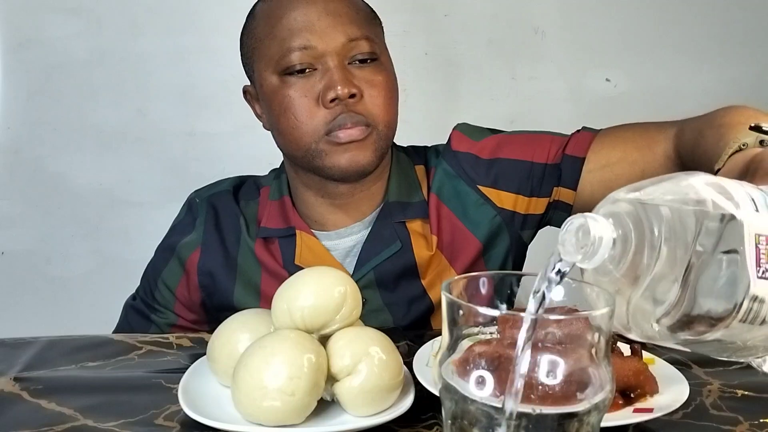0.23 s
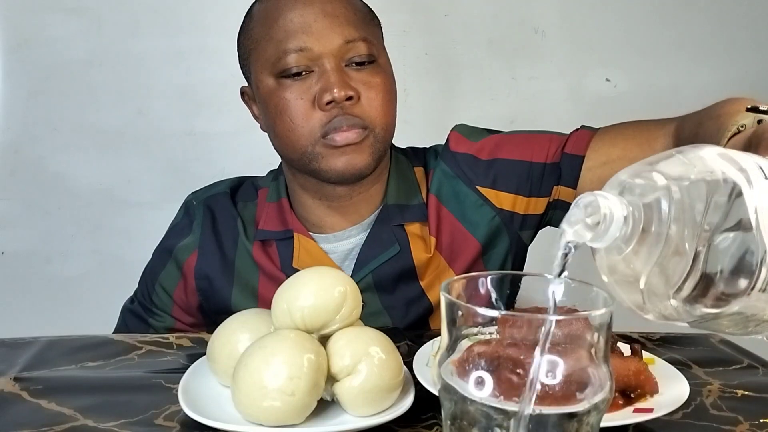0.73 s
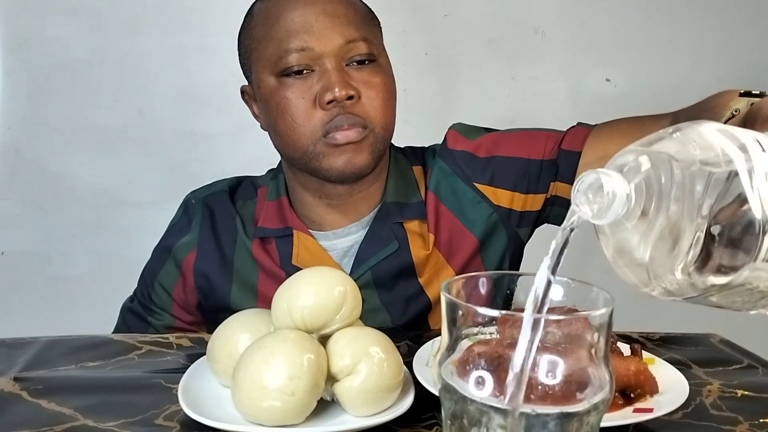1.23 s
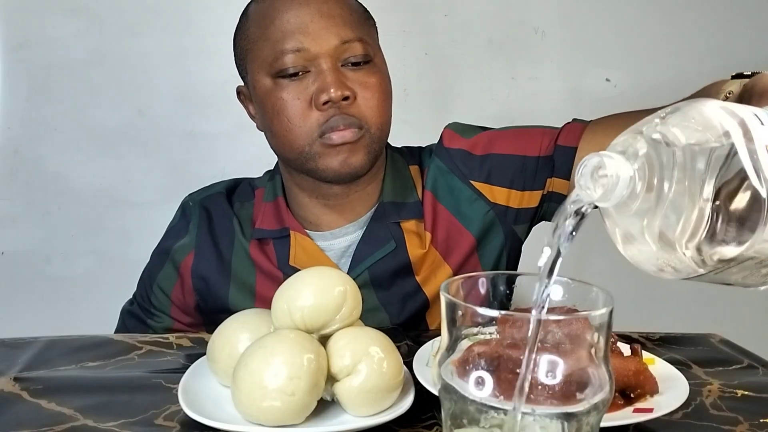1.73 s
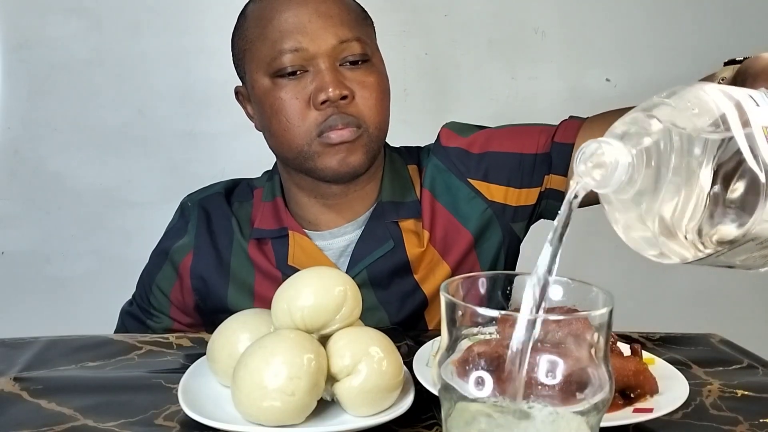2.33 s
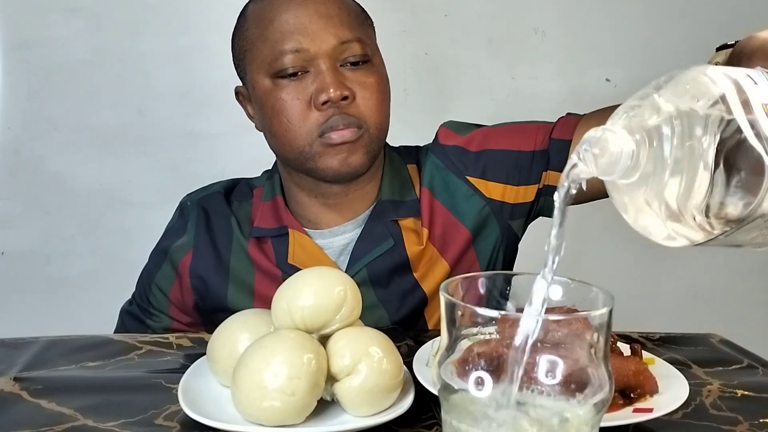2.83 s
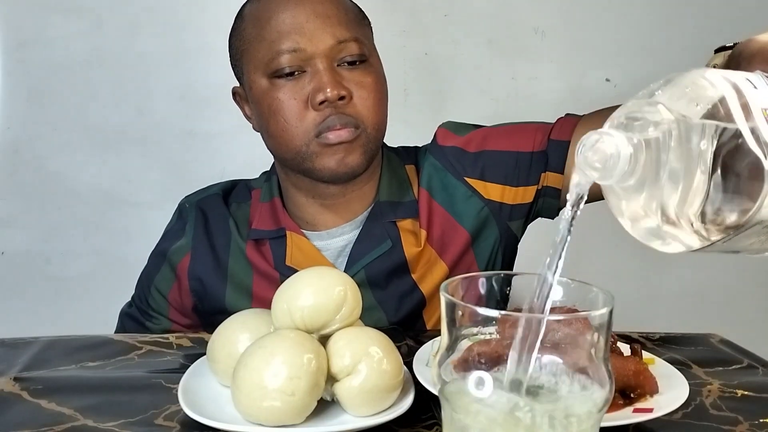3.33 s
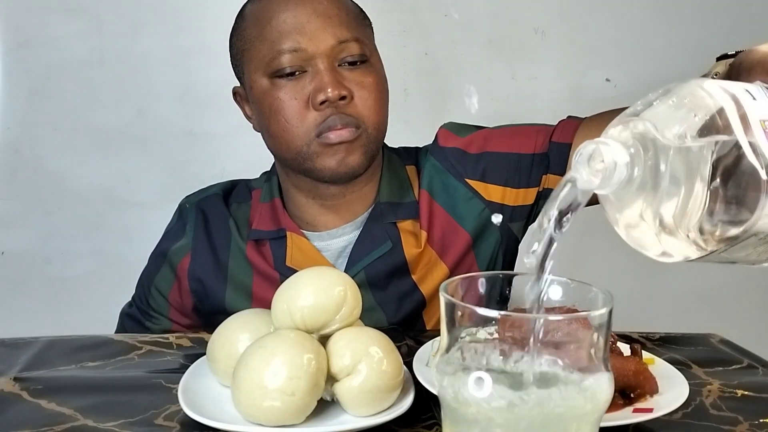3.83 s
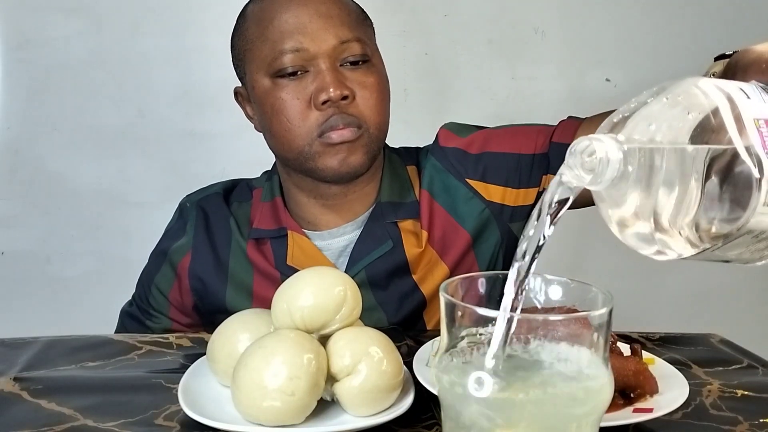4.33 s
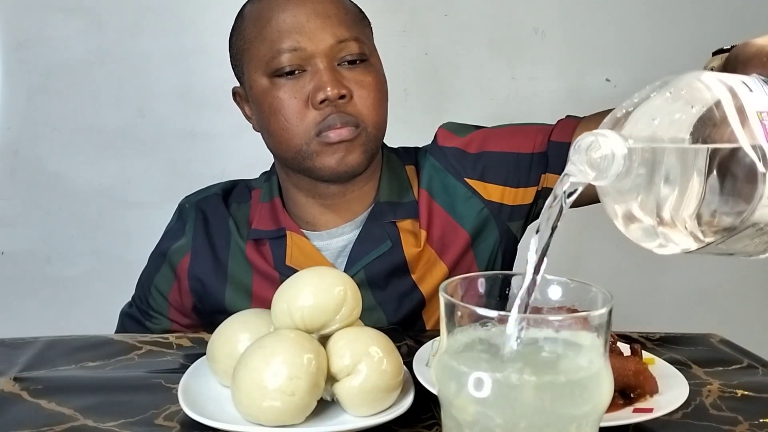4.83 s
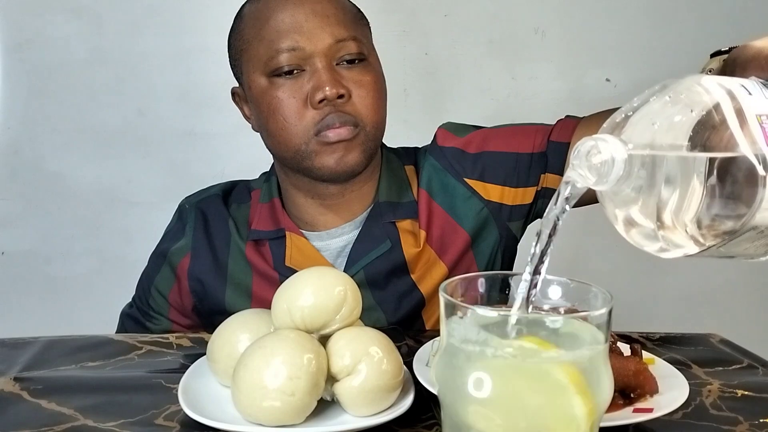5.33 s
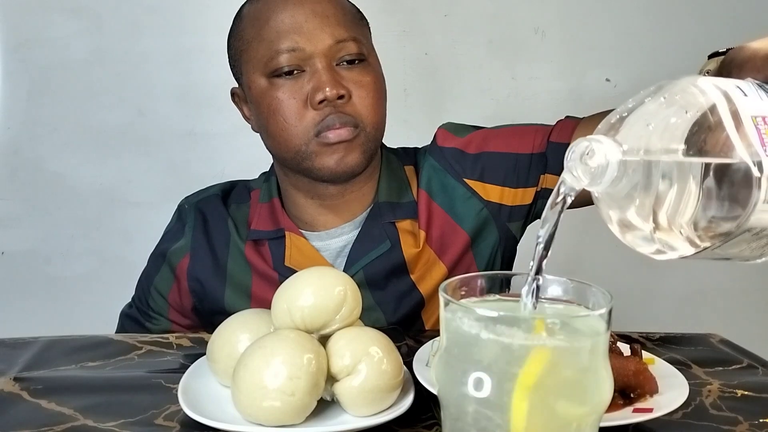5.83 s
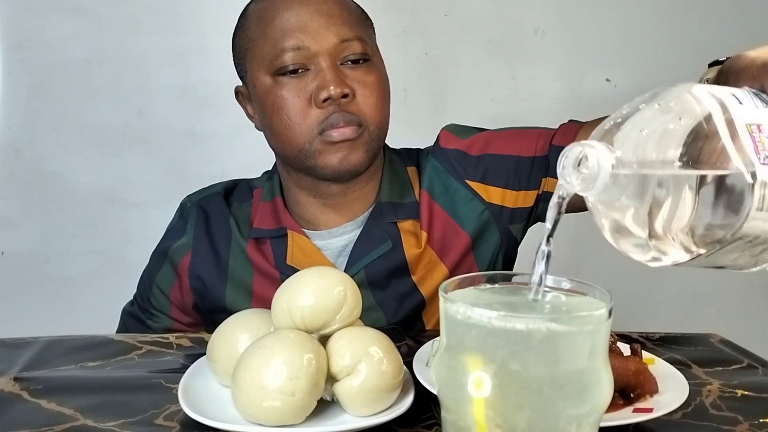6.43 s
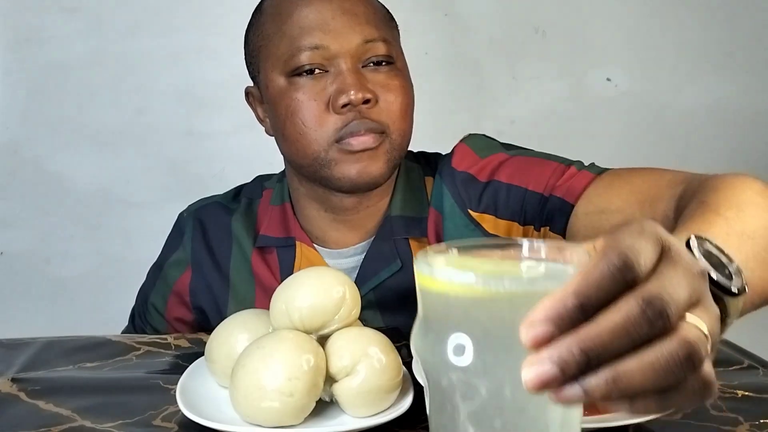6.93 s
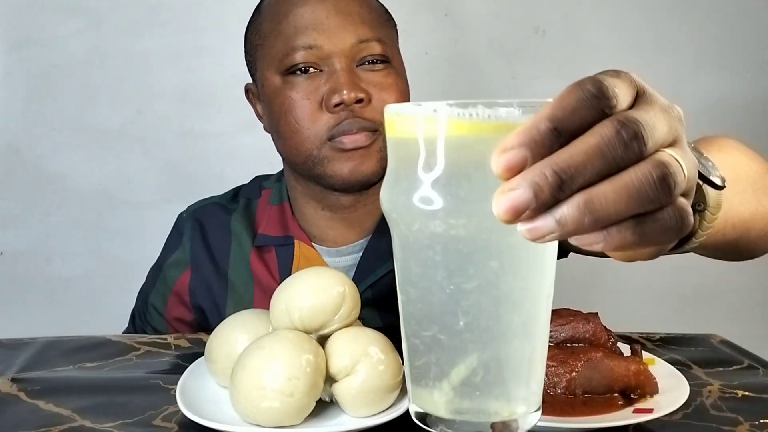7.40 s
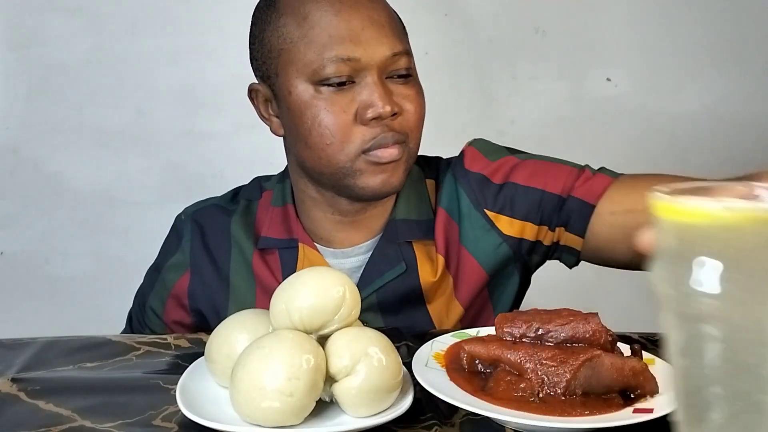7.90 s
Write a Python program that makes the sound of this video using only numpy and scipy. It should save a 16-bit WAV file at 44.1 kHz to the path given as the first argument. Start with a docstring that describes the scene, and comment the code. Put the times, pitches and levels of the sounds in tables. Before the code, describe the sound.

Close-up pouring of water from a big plastic bottle into a drinking glass on a table. A brief plastic snap, a light fizzing trickle, hollow gurgles, then heavier splashing with small table thumps. The glass's hollow note creeps upward; the flow breaks into sparse drips, and a few faint knocks ring briefly in the small bare room over soft hiss.

```python
"""In a bare room, close to a stereo microphone, water is poured from a big plastic bottle into a glass.
The stream drags bubbles under; they ring as decaying sines, coloured by the shortening air column.
Midway it surges and slaps: noise bursts, low pushes of air, rising pocket notes and table modes.
The flow thins to drips, and the bottle is put aside with snaps, modal knocks and a swell of dense noise.
Shaped noise and wavering sines lie beneath as soft hiss and faint hum."""
import sys
import numpy as np
from scipy import signal
from scipy.fft import rfft, irfft
from scipy.io import wavfile

SR = 44100
rng = np.random.default_rng(int(sys.argv[2]) if len(sys.argv) > 2 else 0)


def log_audio(samples):
    """Write samples as a 16-bit WAV file to the path given in sys.argv[1]."""
    # one column per channel
    frames = np.atleast_2d(samples).T
    # limit to full scale, then quantise
    limited = np.clip(frames, -1, 1)
    pcm = np.round(limited * 32767).astype(np.int16)
    wavfile.write(sys.argv[1], SR, pcm)


N = 359944
TIME = np.arange(N) / SR


def amp(db):
    """Level to amplitude: 20 dB is a factor of ten."""
    return 10 ** (np.asarray(db) / 20)


def evened(x):
    """Normalization to unit rms."""
    return x / np.sqrt(np.mean(x ** 2) + 1e-20)


def read(points, hz):
    """Spectral interpolation on a log-frequency axis."""
    f, value = np.transpose(points)
    return np.interp(np.log(hz + 1), np.log(f + 1), value)


def add(mix, s, sound):
    """Superposition: a sound is added to the mix at time s."""
    part = mix[..., max(round(s * SR), 0):][..., :sound.shape[-1]]
    part += sound[..., :part.shape[-1]]


def along(track, s=TIME):
    """Linear interpolation of a (t/s, value) track."""
    return np.interp(s, *np.transpose(track))


def colour(x, points):
    """Minimum-phase filtering: the magnitude response fixes a causal impulse response."""
    log_gain = np.log(amp(read(points, abs(np.fft.fftfreq(2048, 1 / SR)))))
    taps = np.fft.ifft(np.exp(np.conj(signal.hilbert(log_gain)))).real
    return signal.oaconvolve(x, taps[:len(taps) // 2])[:len(x)]


def resonate(x, hz, width):
    """Heterodyne resonance of unit peak gain: shift to 0 Hz, smooth, shift back; hz may be a curve."""
    turn = np.exp(2j * np.pi * np.cumsum(hz * np.ones(len(x))) / SR)
    r = np.exp(-np.pi * width / SR)
    smooth = signal.lfilter([1 - r], [1, -r], x / turn + 1e-18)
    return 2 * (turn * smooth).real


def sung(x, hz, width):
    """Cascaded resonance: two passes steepen the skirts; the result has unit rms."""
    return evened(resonate(resonate(x, hz, width), hz, width))


def drift(per_s):
    """Random modulation: lines between per_s random values a second, at unit rms."""
    knots = np.arange(0, 9, 1 / per_s)
    return evened(np.interp(TIME, knots, rng.standard_normal(len(knots))))


def torn(sound, rough, per_s):
    """Amplitude modulation by turbulence makes a sound flutter."""
    at = np.arange(len(sound)) * per_s / SR
    flutter = np.interp(at, np.arange(256), rng.standard_normal(256))
    return sound * (1 + rough * flutter) / np.hypot(1, rough)


def ring(modes, detune=1):
    """Modal superposition: a struck body sounds as a sum of decaying sines."""
    t = np.arange(SR // 2) / SR
    return sum(amp(db - 60 * t / t60) * np.sin(2 * np.pi * hz * detune * t) for hz, db, t60 in modes)


def ticks(points, per_s, spread_db):
    """Shot noise: clicks of random sign and uneven size, with the given colour."""
    clicks = (rng.random(N) < per_s / SR) * rng.choice([-1, 1], N)
    sizes = amp(spread_db * np.minimum(rng.exponential(1, N), 4))
    return evened(colour(clicks * sizes, points))


def bubble(hz, length, rise):
    """Volume oscillation: a trapped bubble swells, rings and dies, gliding by 2 * rise of its pitch."""
    t = np.arange(int(8 * length * SR) + 2) / SR
    shape = (1 - np.exp(-(t / (.4 * length)) ** 2)) * np.exp(-t / (.7 * length))
    pitch = hz * (1 + rise * (2 * np.tanh(t / length / 2) - .7))
    return shape / shape.max() * np.sin(2 * np.pi * (np.cumsum(pitch) / SR + rng.random()))


# time scale of an unstretched ring at 1 kHz (s); it shrinks with this power of the pitch
RING_S, RING_POWER = 0.0033, 0.35


def plop(hz, rise=0.036, lead=.2, stretch=1):
    """Damping by size: smaller, higher bubbles die sooner; returns a head start in s and the sound."""
    length = stretch * RING_S * (hz / 1000) ** -RING_POWER
    return lead * length, bubble(hz, length, rise)


def swarm(sizes, per_s, cycles, spread_db, rise, count):
    """Random superposition: many bubbles born by chance, most of them faint; per_s may be a curve."""
    out = np.zeros(N)
    for hz in np.geomspace(sizes[0][0], sizes[-1][0], count):
        births = np.flatnonzero(rng.random(N) < per_s / count / SR)
        for s, (detune, life, size) in zip(births / SR, rng.random((len(births), 3))):
            db = read(sizes, hz) + spread_db * min(-np.log(1 - size), 3)
            pitch = hz * (1 + 0.14 * (detune - .5))
            add(out, s, amp(db) * bubble(pitch, cycles * 4 ** (life - .6) / hz, rise))
    return evened(out / np.sqrt(per_s))


# strength of the stream before its balance: t/s, gurgle level/dB, fine bubbling level/dB
STREAM = [(.05, -77, -56), (.3, -73, -54), (.45, -77, -48), (.75, -53.5, -46.5), (.9, -49.5, -46),
          (1.3, -41.5, -44.5), (1.55, -46.5, -43.5), (1.8, -50, -47), (2.1, -51, -45.5),
          (2.55, -48.5, -46.5), (2.85, -44.5, -46), (3.6, -45, -45), (3.9, -54, -48), (4.25, -45.5, -52),
          (4.7, -77.5, -61), (4.85, -82.5, -63.5), (5.5, -85.5, -68), (5.53, -79, -52), (5.63, -76, -54),
          (5.68, -85.5, -67), (6.0, -105, -78.5), (6.6, -93, -99)]
# strength of the large bubbles by pitch: f/Hz, level/dB
GURGLE = [(150, -15), (280, -15.5), (400, -3), (600, -4), (850, 0), (1300, -3), (2200, -6.5)]
# strength of the small bubbles by pitch: f/Hz, level/dB
FINE = [(1100, -22.5), (1600, -5.5), (2300, 1), (3100, -0.5), (4300, 0.5), (5200, 2), (6500, -8),
        (9000, -2), (14000, -1)]
# strength of the clearer stray bubbles by pitch: f/Hz, level/dB
STRAYS = [(1700, -5), (2600, 0), (4800, -2)]
# colour of bursting spray, also in slaps and drips: f/Hz, level/dB
SPRAY = [(300, -7), (1200, 1.5), (3000, -3), (4500, 3.5), (6000, -6.5), (8000, -7), (15000, -12)]
# colour of tiny bursting bubbles: f/Hz, level/dB
FIZZ = [(400, -11.5), (1500, -5), (3500, -8), (5500, 1), (8500, 1.5), (12000, -8.5), (15500, -6)]
# bubbles born a second, the large and small ones at full flow
LARGE_PER_S, SMALL_PER_S, STRAYS_PER_S = 750, 1500, 55
# half of the upward pitch glide, as a share of the pitch
SMALL_RISE, STRAY_RISE = .05, .09


def stream(gurgle_db=-3.0, neck_db=-8, wake_db=-3, wake_s=0.01, fine_db=-4, stray_db=-9,
           spray_db=-10.0, fizz_db=-15, lumps_db=4, full_db=-46, tick_spread_db=4):
    """Air entrainment: large bubbles drive pocket and column, small ones ring amid spray, all in lumps."""
    start, gurgle_level, fine_level = np.transpose(STREAM)
    gurgle = np.interp(TIME, start, gurgle_level)
    fine = np.interp(TIME, start, fine_level)
    lumps = amp(lumps_db * drift(per_s=45)) * np.clip((6.62 - TIME) / 0.17, 0, 1)
    wake = np.zeros(N)
    age = np.arange(SR // 4) / SR / wake_s
    for surge_s, _, db in THUMPS:  # the stream necks down just before each surge, and churns in its wake
        lumps = lumps * amp(neck_db * np.exp(-((TIME - surge_s + 0.022) / 0.022) ** 2))
        add(wake, surge_s, amp(wake_db + db) * age * np.exp(1 - age))
    flow = np.clip(amp(fine - full_db), .2, 1)  # a thin stream makes fewer bubbles and spray ticks
    large = swarm(GURGLE, per_s=LARGE_PER_S * flow, cycles=3.9, spread_db=1.5, rise=0.05, count=24)
    small = swarm(FINE, per_s=SMALL_PER_S * flow, cycles=9, spread_db=3.5, rise=SMALL_RISE, count=60)
    small = small * (1 + .4 * drift(per_s=700))
    strays = swarm(STRAYS, per_s=STRAYS_PER_S, cycles=15, spread_db=3.5, rise=STRAY_RISE, count=16)
    strays = strays * flow
    spray = ticks(SPRAY, per_s=1200 * flow, spread_db=tick_spread_db)
    fizz = ticks(FIZZ, per_s=130, spread_db=11.0)
    bright = amp(fine_db) * small + amp(stray_db) * strays + amp(spray_db) * spray + amp(fizz_db) * fizz
    low = amp(gurgle_db + gurgle) * gurgling(large)
    high = amp(fine) * glass(bright, column_db=8, overtone_db=4)
    return lumps * (low + high) + wake * large


# note of the air pocket that the stream digs: t/s, f/Hz
CAVITY = [(.7, 692), (1.1, 450), (1.4, 487), (1.7, 391), (2.6, 360), (2.88, 289), (3.9, 315), (4.3, 356)]


def gurgling(large, cavity_db=-4, loose_db=-6, cavity_width=150, note_width=170, sway=0.052, body_db=-11):
    """Forced resonance: large bubbles drive pocket and column, whose notes sway with the surface."""
    pocket = sung(large, along(CAVITY) * (1 + sway * drift(per_s=23)), cavity_width)
    column = sung(large, column_hz(TIME) * (1 + sway * drift(per_s=23)), note_width)
    body = sum(amp(db) * resonate(large, hz, width) for hz, width, db in HOLLOW)
    return column + amp(cavity_db) * pocket + amp(loose_db) * large + amp(body_db) * body


# hollow resonances around the glass and table, also in the gurgle: f/Hz, width/Hz, level/dB
HOLLOW = [(79, 10, 11), (166, 16, 9)]


def glass(water, column_db, overtone_db, column_width=70, overtone_width=130):
    """Closed-pipe resonance: the air rings at its quarter-wave note and three and five times that."""
    hz = column_hz(TIME)
    third = resonate(water, 3 * hz, overtone_width)
    fifth = resonate(water, 5 * hz, overtone_width)
    air = amp(column_db) * resonate(water, hz, column_width) + amp(overtone_db) * (third + .5 * fifth)
    return water + air + sum(amp(db) * resonate(water, f, width) for f, width, db in HOLLOW)


# height of the air above the water as the glass fills: t/s, height/m
HEADROOM = [(0, 0.13), (1.1, 0.12), (1.5, .114), (1.8, 0.11), (2.15, 0.1), (2.8, 0.098), (3.6, 0.091),
            (4.35, .063), (5.3, 0.045), (5.8, 0.048), (6.6, 0.024)]
SOUND_M_PER_S = 343


def column_hz(s):
    """Quarter-wave law: the note is the speed of sound over four times the height of the air."""
    return SOUND_M_PER_S / along(HEADROOM, s) / 4


# the stream swallows a pocket of air, and a large bubble breaks off it, before their balance:
# t/s, pocket level/dB, bubble level/dB, bubble f/Hz
GULPS = [(.641, -65, -32, 815), (.772, -46, -30, 714), (.882, -37, -23.5, 853), (.932, -32.5, -24, 786),
         (1.028, -47.5, -16, 710), (1.047, -24.5, -22.5, 703), (1.185, -61, -20.5, 660),
         (1.227, -58, -26, 577), (1.334, -49.5, -28, 680), (1.488, -33, -29, 740), (1.651, -26, -33, 784),
         (1.839, -34, -30, 784), (1.929, -33.5, -34.5, 880), (2.193, -40, -33.5, 900),
         (2.23, -37, -30, 834), (2.288, -35, -32.5, 866), (2.548, -53, -36, 865), (2.888, -21.5, -31, 930),
         (3.002, -38, -26, 850), (3.087, -45.5, -22, 926), (3.188, -30.5, -39.5, 870),
         (3.268, -48, -28.5, 910), (3.377, -32, -35.5, 738), (3.49, -27.5, -24, 490),
         (3.606, -26, -22.5, 1013), (3.729, -23.5, -18, 940), (3.837, -52, -16.5, 420),
         (3.951, -30, -45, 510), (3.978, -29, -50, 520), (4.149, -41, -33, 476)]


def gulps(pocket_db=2, bubble_db=1.0, pocket_s=0.0063, deepening=.7, bubble_s=0.004, rise=0.017,
          lead=0.19, hollow_db=-8):
    """Cavity pinch-off: a low pocket note and a large bubble, both torn; the hollow resonates on."""
    out = np.zeros(N)
    for s, low_db, high_db, hz in GULPS:
        length = pocket_s * (column_hz(s) / column_hz(0)) ** deepening  # longer in deeper water
        pocket = torn(bubble(along(CAVITY, s), length, rise=0), rough=0.27, per_s=260)
        large = torn(bubble(hz, bubble_s, rise), rough=0.24, per_s=400)
        add(out, s - lead * length, amp(pocket_db + low_db) * pocket)
        add(out, s - lead * bubble_s, amp(bubble_db + high_db) * large)
    return out + amp(hollow_db) * resonate(out, along(CAVITY), width=11)


# single short rings, before their balance: mostly bubbles, with a few in the bottle's knocks and
# crackle: t/s, f/Hz, level/dB
SHORT_RINGS = [(0.059, 4050, -47), (0.082, 4530, -43), (0.3374, 4600, -33), (0.476, 4650, -31),
               (.52, 2220, -31), (.527, 4400, -29.5), (.611, 1980, -29), (0.6842, 2010, -31),
               (.741, 2010, -30.5), (0.746, 4320, -29), (0.863, 4600, -27.5), (0.869, 1960, -17.5),
               (0.882, 2560, -18.5), (0.9102, 1910, -23.5), (1.012, 2650, -26.5), (1.029, 1070, -30.5),
               (1.057, 1740, -31), (1.132, 2040, -27.5), (1.183, 1470, -32), (1.26, 2300, -25),
               (1.298, 2150, -25), (1.326, 1840, -25.5), (1.41, 1730, -30.5), (1.454, 2060, -30),
               (1.639, 4800, -33.5), (1.7054, 2250, -32.5), (1.706, 3920, -34.5), (1.757, 2670, -31),
               (1.801, 4470, -29.5), (1.928, 1440, -36.5), (1.984, 2510, -22.5), (2.02, 4330, -31),
               (2.143, 3730, -32), (2.146, 2670, -31), (2.1714, 3870, -26.5), (2.424, 2530, -32.5),
               (2.436, 2780, -29.5), (2.563, 4140, -34), (2.579, 4980, -34), (2.6768, 3910, -32.5),
               (2.861, 4780, -32), (2.922, 2130, -26.5), (3.0067, 4590, -11.5), (3.1593, 2240, -16.5),
               (3.2573, 3780, -23.5), (3.267, 2570, -24), (3.335, 5780, -32.5), (3.383, 1390, -23),
               (3.4905, 5640, -21), (3.62, 1654, -20), (3.7268, 4300, -11), (3.7269, 5750, -14),
               (3.779, 2350, -24), (3.842, 1590, -19), (3.925, 2940, -26.5), (4.097, 2390, -28.5),
               (4.139, 2710, -26.5), (4.215, 2190, -34.5), (4.229, 1790, -33), (5.52, 5730, -43),
               (6.67, 3770, -34.5)]


def short_rings(level_db=3.5, usual_db=-25, damping=0.077, rise=0.075):
    """Level-dependent damping: single short rings, of which the strongest die soonest for their pitch."""
    out = np.zeros(N)
    for s, hz, db in SHORT_RINGS:
        early, sound = plop(hz, rise, stretch=amp(damping * (usual_db - db)))
        add(out, s - early, amp(db + level_db) * sound)
    return out


# lumps of water slapping the surface, before their balance:
# t/s, level/dB, trim of the low push/dB, decay time/s
SLAPS = [(0.444, -24, -40.5, 0.0094), (0.771, -18, -34.5, 0.0021), (0.875, -19.5, -32, 0.022),
         (1.646, -26, 4, 0.0035), (1.767, -32.5, -10, 0.0053), (2.1394, -22.5, -27, 0.0017),
         (2.878, -20.5, -8, 0.0022), (2.892, -17, 0.5, 0.0023), (2.962, -18.5, -10.5, 0.0076),
         (3.0027, -13.5, -13.5, 0.005), (3.188, -23.5, -15.5, 0.0054), (3.265, -13, -13, 0.0072),
         (3.376, -15, -26, 0.02), (3.489, -12, -17, 0.01), (3.601, -21.5, -13, 0.0025),
         (3.7254, -8.5, -12.5, 0.0039), (3.8375, -13, 1, 0.0052), (3.914, -25.5, -31, 0.0099),
         (4.14, -27, -25, 0.0072)]


def slaps(spray_db=0, onset_s=0.00027, push_db=-7, push_hz=260, drops_db=-17, drops_s=0.016,
          drops_per_s=300, fizz_db=-7, fizz_s=.015, fizz_per_s=200):
    """Impact radiation: a crack of spray, falling droplets, bursting foam and a push of air."""
    out, t = np.zeros(N), np.arange(SR // 8) / SR
    u = 2 * np.pi * push_hz * t
    push = np.gradient(np.gradient(u ** 3 * np.exp(-u)))
    for s, db, low_db, length in SLAPS:
        burst, drops, foam = rng.standard_normal((3, len(t)))
        drops = evened(drops * (rng.random(len(t)) < drops_per_s / SR)) * np.exp(-t / drops_s)
        shape = (1 - np.exp(-t / onset_s)) * np.exp(-t / max(length, .0005))
        spray = colour(torn(burst, rough=1.2, per_s=410) * shape + amp(drops_db) * drops, SPRAY)
        foam = colour(foam * (rng.random(len(t)) < fizz_per_s / SR) * np.exp(-t / fizz_s), FOAM)
        parts = amp(spray_db) * spray / abs(spray).max() + amp(fizz_db) * foam / (abs(foam).max() + 1e-9)
        add(out, s, amp(db) * (parts + amp(push_db + low_db) * push / push.max()))
    return out


# cavities closing behind a surge, before their balance:
# t/s, length/s, first f/Hz, last f/Hz, level/dB
GLUGS = [(2.884, 0.04, 507, 1140, -37.5), (3.086, 0.036, 840, 1580, -41), (3.379, 0.011, 1210, 2400, -36.5),
         (3.501, 0.045, 400, 1100, -41.5), (3.597, .032, 805, 2154, -26), (3.769, .03, 2140, 2560, -35.5),
         (3.98, 0.137, 332, 2400, -43), (4.123, 0.025, 1430, 3040, -37.5), (4.314, 0.048, 740, 1650, -46.5)]


def glugs(width=300):
    """Shrinking-cavity resonance: noise rings at a rising pitch, rough as churning water."""
    out = np.zeros(N)
    for s, length, first_hz, last_hz, db in GLUGS:
        hz = np.geomspace(first_hz, last_hz, int(length * SR))
        rough = sung(rng.standard_normal(len(hz)), hz, width)
        add(out, s, amp(db) * rough * signal.windows.tukey(len(hz), .6))
    return out


# the heaviest surges, which also shape stream and froth: t/s, thump level/dB, wake level/dB
THUMPS = [(2.881, -24, -38.5), (3.002, -42.5, -43.5), (3.18, -28, -45.5), (3.267, -46.5, -43),
          (3.378, -40.5, -38.5), (3.494, -26.5, -36.5), (3.6, -31.5, -31.5), (3.727, -19.5, -33.5),
          (3.837, -48, -42.5), (3.947, -33, -41.5)]
# modes of the table before detuning: f/Hz, level/dB, t60/s
TABLE = [(81, -12, 0.32), (173, -5, 0.16), (214, -6, 0.1), (307, -2.5, 0.16)]


def thumps(spread=.04):
    """Modal excitation: the weight of each surge sets the table humming, at slightly varied pitch."""
    out = np.zeros(N)
    for (s, db, _), chance in zip(THUMPS, rng.uniform(-1, 1, len(THUMPS))):
        add(out, s, amp(db) * ring(TABLE, detune=1 + spread * chance))
    return out


# strength of the bubbles churned up behind a surge: f/Hz, level/dB
FROTH = [(550, -3), (1000, -2), (1700, -1), (3000, 0)]
FROTH_PER_S = 330  # bubbles born a second


def froth(level_db=-3, swell_s=0.021):
    """Bubble-cloud radiation: each surge drags down air that rings as overlapping bubbles, then fades."""
    cloud, age = np.zeros(N), np.arange(SR // 3) / SR / swell_s
    for s, _, db in THUMPS:
        add(cloud, s, amp(level_db + db) * age * np.exp(1 - age))
    return cloud * swarm(FROTH, per_s=FROTH_PER_S, cycles=11, spread_db=4.5, rise=SMALL_RISE, count=20)


# the thin trickle breaks into drips, before their balance: t/s, level/dB, main bubble f/Hz
DRIPS = [(4.4363, -33, 2810), (4.502, -37, 2780), (4.5143, -36.5, 4470), (4.5428, -45, 4420),
         (4.6068, -35.5, 4830), (4.627, -38, 3370), (4.7033, -33, 2910), (4.7465, -32, 5150),
         (4.852, -52, 3840), (4.9306, -43, 2740), (4.9493, -44, 1610), (4.9802, -41.5, 2580),
         (5.0723, -41.5, 2370), (5.086, -43, 2000), (5.1146, -48.5, 4520), (5.1844, -46.5, 3090),
         (5.2145, -45, 1620), (5.2872, -44, 4690), (5.2988, -41, 2320), (5.348, -49, 6140),
         (5.5191, -34.5, 1674), (5.5581, -42, 2360), (5.5765, -44, 2360), (5.595, -39, 2040),
         (5.6355, -40, 1640), (5.8027, -46.5, 1924), (5.892, -51.5, 4150), (5.9158, -49.5, 4260),
         (6.0891, -52, 5730), (6.2415, -42.5, 2600), (6.308, -50, 4000)]


def drips(main_db=0, splash_db=-8.5, splash_s=0.0076, dent_db=-14, dent_hz=900, brood_db=-9,
          brood_s=0.022, fade_db=7, low_hz=1400, high_hz=5600, count=6):
    """Drop impact: a splash, a dent in the surface, one main bubble and a brood of fainter ones."""
    out, t = np.zeros(N), np.arange(SR // 20) / SR
    for s, db, hz in DRIPS:
        splash = colour(rng.standard_normal(len(t)) * np.sqrt(t) * np.exp(-t / splash_s), SPRAY)
        dent = plop(dent_hz * rng.uniform(0.67, 1.64), stretch=0.83)[1]
        main = torn(plop(hz, rise=0.011, stretch=1.76)[1], rough=0.06, per_s=1880)
        add(out, s, amp(db + splash_db) * splash / abs(splash).max())
        add(out, s, amp(db + dent_db) * dent)
        add(out, s, amp(db + main_db) * main)
        for late, size in rng.random((count, 2)):
            small = plop(low_hz * (high_hz / low_hz) ** size, rise=0.056, stretch=1.7)[1]
            add(out, s + brood_s * late ** 2, amp(db + brood_db - fade_db * late) * small)
    return out


# bubbles that float clear of the stream and ring on:
# t/s, f/Hz, level/dB, time scale/s, half glide as a share of the pitch
FLOATERS = [(1.253, 4850, -31.5, 0.0086, 0), (1.281, 4850, -33, 0.011, 0), (2.903, 920, -24, 0.011, 0.12),
            (4.228, 1437, -32, 0.0091, 0.051), (4.319, 376, -36.5, .03, 0.0095),
            (4.338, 1331, -36.5, 0.014, 0.034), (4.35, 2770, -33, .006, 0.015), (4.44, 2710, -42, 0.013, 0),
            (4.495, 1110, -52.5, 0.029, 0), (4.745, 1630, -33.5, 0.0073, 0.2),
            (6.699, 1425, -30, 0.0087, 0.14)]


def floaters(level_db=0):
    """Free oscillation: bubbles clear of the stream ring undisturbed, some gliding upward."""
    out = np.zeros(N)
    for s, hz, db, length, rise in FLOATERS:
        add(out, s, amp(level_db + db) * bubble(hz, length, rise))
    return out


# foam bubbles bursting on the surface, before their balance: t/s, level/dB
POPS = [(0.4733, -32.5), (0.5357, -33.5), (0.7567, -39), (0.8809, -42), (1.264, -36), (2.0107, -38),
        (2.968, -30), (3.0922, -26), (3.1945, -33.5), (3.603, -28.5), (3.8389, -25), (4.1335, -44),
        (4.2132, -36.5), (4.701, -42), (4.9751, -44), (5.2756, -47), (5.391, -42), (5.5042, -43),
        (5.52, -42), (5.595, -44), (5.7332, -50), (5.8, -42)]
# colour of bursting foam, also in slaps: f/Hz, level/dB
FOAM = [(3000, -22), (6000, -8), (9000, -2), (13500, -3)]


def pops(level_db=11.0, snap_s=0.0011):
    """Film rupture: a foam bubble bursts with a short, bright snap of noise."""
    out, t = np.zeros(N), np.arange(SR // 50) / SR
    for s, db in POPS:
        snap = colour(rng.standard_normal(len(t)) * np.exp(-t / snap_s), FOAM)
        add(out, s, amp(db + level_db) * snap / abs(snap).max())
    return out


# the bottle crackling and knocking, before its balance:
# t/s, level/dB, trim of the thud/dB, share sent to the room/dB
KNOCKS = [(0.079, -25, -27, -4), (0.2445, -15, -20, -3.5), (0.249, -22.5, -20, -12), (6.63, -39.5, -4, -3),
          (6.668, -31, -28, -7), (6.699, -23.5, -25, -28), (6.715, -44.5, 14.5, 7), (6.724, -35.5, 2, 1.5),
          (6.735, -29.5, -28, 3.5), (6.83, -41, -14, -5), (6.838, -35.5, -13, -4), (6.897, -39.5, -11, -10),
          (6.934, -37, -4.5, -4)]
# resonances of the bottle: f/Hz, level/dB, t60/s
BOTTLE = [(178, -13, 0.14), (267, -7.5, 0.04), (416, -22, 0.12), (865, -10, 0.021)]
# colour of the snapping plastic: f/Hz, level/dB
CRACK = [(300, 0), (1000, -11.5), (1800, -0.5), (4200, 2.5), (6000, -8.5), (9000, -13.5), (15000, -18.5)]
# colour of the put-down knock reverberating in the room: f/Hz, level/dB
SWELL = [(500, -11.5), (1400, 17), (2800, 2), (3700, 9), (5200, 8), (7000, -14), (10000, 1), (13000, 11)]
SWELL_START_S, SWELL_RISE_S = 6.72, .016  # onset, and time from there to the peak


def bottle(crack_db=-3, crack_s=0.0013, thud_db=-3, swell_db=-56.5):
    """Shell impact: snaps, modal thuds and a reverberant noise swell; returns direct and room-bound sound."""
    direct, sent, t = np.zeros(N), np.zeros(N), np.arange(SR // 2) / SR
    for s, db, low_db, room_db in KNOCKS:
        crack = colour(rng.standard_normal(len(t)) * np.exp(-t / crack_s), CRACK)
        thud = amp(thud_db + low_db) * ring(BOTTLE)
        knock = amp(db) * (amp(crack_db) * crack / abs(crack).max() + thud)
        add(direct, s, knock)
        add(sent, s, amp(room_db) * knock)
    # dense noise swelling and fading: the put-down knock reverberating in the room
    age = t / SWELL_RISE_S
    dense = ticks(SWELL, per_s=2000, spread_db=2)[:len(t)]
    swell = amp(swell_db) * dense * age * np.exp(1 - age)
    add(direct, SWELL_START_S, swell)
    add(sent, SWELL_START_S, swell)
    return direct, sent


# spectrum of the early echoes, strongest at the top: f/Hz, level/dB
EARLY = [(100, -5.5), (1000, -4), (5000, -12), (12000, -2)]


def near(x, early_s=0.014, count=40):
    """Early reflection: direct sound with first echoes from table, plates and pourer."""
    taps = np.zeros((2, SR // 20))
    delays, skews = rng.uniform(.0006, .022, count), rng.uniform(-.0004, .0004, count)
    for delay, skew, sign in zip(delays, skews, rng.choice([-1, 1], count)):
        at = [int(delay * SR), int((delay + skew) * SR)]  # left, right
        taps[[0, 1], at] += sign * np.exp(-delay / early_s)
    taps = taps / np.linalg.norm(taps[0])
    echoes = signal.oaconvolve(colour(x, EARLY)[None], taps, axes=1)[:, :N]
    # the highest treble is scattered, reaching each microphone by its own short paths
    top = signal.sosfiltfilt(signal.butter(4, 7500, "high", fs=SR, output="sos"), x)
    paths = rng.standard_normal((2, 24)) * np.exp(-np.arange(24) / 8)
    paths = paths / np.linalg.norm(paths, axis=1, keepdims=True)
    scattered = signal.oaconvolve(top[None], paths, axes=1)[:, :N]
    return x - top + scattered + echoes


# decay of the room: f/Hz, t60/s
ROOM_T60 = [(100, 0.5), (400, 0.36), (1400, 0.5), (4000, 0.5), (14000, 0.58)]
# colour of the room: f/Hz, level/dB
ROOM_COLOUR = [(60, -7), (300, -3), (1000, 0), (3000, 0.5), (6000, -1.5), (14000, 1)]


def room(x, build_s):
    """Diffuse reverberation: noise builds up and each band decays at its own rate, partly alike in stereo."""
    hz, t, z = signal.stft(rng.standard_normal((2, SR)), SR, nperseg=256)
    same = np.clip(read(AIR_SAME, hz), -1, 1)[:, None]
    z[1] = same * z[0] + np.sqrt(1 - same ** 2) * z[1]
    decay_db = read(ROOM_COLOUR, hz)[:, None] - 60 * t / read(ROOM_T60, hz)[:, None]
    z *= amp(decay_db) * (1 - np.exp(-(t / build_s) ** 2))
    tail = signal.istft(z, SR, nperseg=256)[1]
    return signal.fftconvolve(x[None], tail / np.linalg.norm(tail[0]), axes=1)[:, :N]


# spectrum of the hiss before its overall level: f/Hz, level/dB per Hz
AIR = [(25, -26.5), (45, -21.5), (70, -16), (100, -10.5), (130, -18), (200, -23), (290, -25), (1300, -35),
       (1800, -26), (2600, -37), (5000, -31), (7000, -49.5), (9500, -53), (13000, -29.5), (14000, -39.5),
       (15000, -74)]
AIR_DB = -69.5
# left-right likeness of hiss and reverberation: f/Hz, correlation
AIR_SAME = [(60, 1), (130, 0.036), (290, 0.41), (640, 0.31), (1410, 0.094), (3100, 0.039)]
# hum and whine lines, about which pitch and level wander: f/Hz, level/dB rms
HUM = [(98.2, -70), (99.7, -65.5), (198, -79), (1582, -85.5), (1781, -89.5), (1830, -77.5), (1928, -85)]


def still_room(hiss_db=0, hum_db=0, waver_db=1.5, wander_hz=0.42):
    """Partially coherent noise and beating: soft hiss under a wavering hum with a faint whine."""
    hz = np.fft.rfftfreq(N, 1 / SR)
    a, b = rfft(rng.standard_normal((2, N)))
    same = np.clip(read(AIR_SAME, hz), -1, 1)
    z = np.array([a, same * a + np.sqrt(1 - same ** 2) * b]) * amp(read(AIR, hz))
    hiss = irfft(z, N) / np.std(irfft(z.mean(0) * (hz > 250), N))  # levelled by its part above 250 Hz
    hum = np.zeros(N)
    for f, db in HUM:
        phase = 2 * np.pi * np.cumsum(f + wander_hz * drift(per_s=11)) / SR
        hum += amp(db + waver_db * drift(per_s=2.0)) * np.sin(phase)
    return amp(AIR_DB + hiss_db) * hiss + amp(hum_db) * np.sqrt(2) * hum


# responses of the left and right microphones: f/Hz, level/dB
MIC_LEFT = [(25, -12.5), (90, -0.5), (400, -4), (2400, -2.5), (4400, -1.5), (6100, -5.5), (7300, -15),
            (9600, -9), (11500, -5.5), (14000, -3), (15500, -32)]
MIC_RIGHT = [(25, -11.5), (90, -3.5), (400, -5.5), (2400, -3.5), (4400, 1), (6100, 7.5), (7300, -4),
             (9600, -10.5), (11500, 2.5), (14000, -1.5), (15500, -39.5)]


def scene(churn_db=0, splashes_db=-1, water_wet_db=-9.0, bottle_wet_db=5):
    """Direct-to-reverberant balance: the glass is close and fairly dry, the bottle excites the room."""
    splashes = glass(short_rings() + gulps() + slaps() + glugs(), column_db=-2, overtone_db=-19.5)
    splashes = splashes + glass(drips(), column_db=-10, overtone_db=-3)
    water = amp(churn_db) * stream() + amp(splashes_db) * splashes
    water = water + pops() + thumps() + floaters() + froth()
    plastic, plastic_sent = bottle()
    water_walls = amp(water_wet_db) * room(water, build_s=0.014)
    bottle_walls = amp(bottle_wet_db) * room(plastic_sent, build_s=0.0033)
    left, right = near(water + plastic) + water_walls + bottle_walls
    return np.array([colour(left, MIC_LEFT), colour(right, MIC_RIGHT)]) + still_room()


EDGE_HZ = 15700


def record(dry):
    """Band limitation: the sound fades in after a moment and is low-passed at EDGE_HZ."""
    opened = dry * np.clip((TIME - .03) / 0.028, 0, 1)
    lowpass = signal.firwin(255, EDGE_HZ, window=("kaiser", 9), fs=SR)
    return signal.oaconvolve(opened, lowpass[None], "same")


dry = scene()
out = record(dry)
log_audio(out)
```